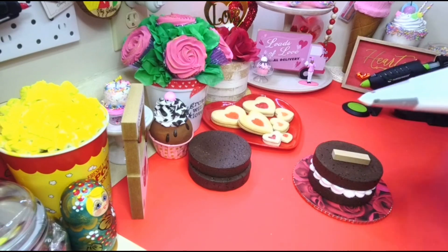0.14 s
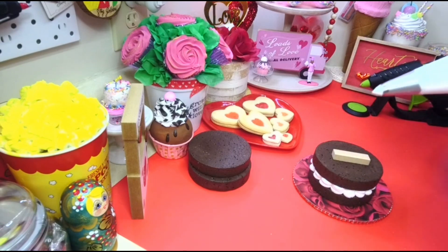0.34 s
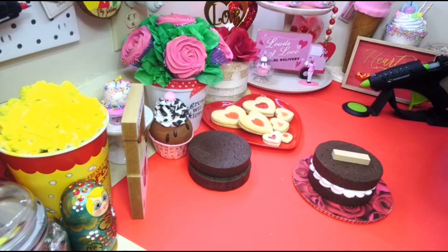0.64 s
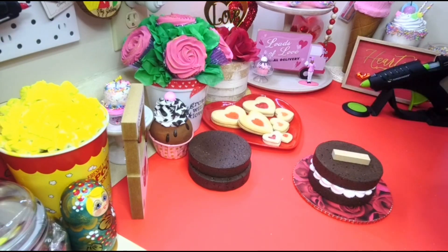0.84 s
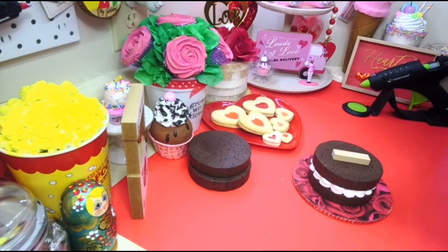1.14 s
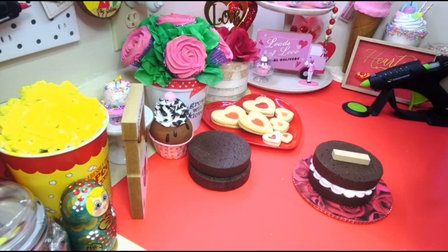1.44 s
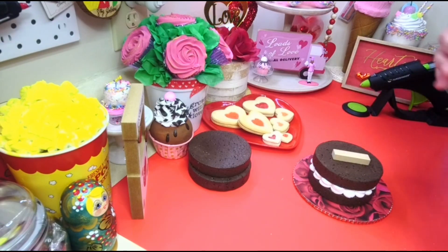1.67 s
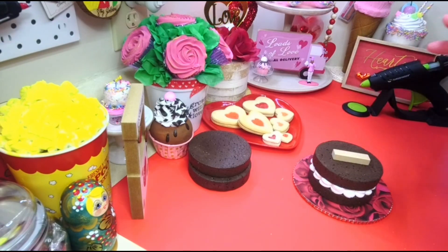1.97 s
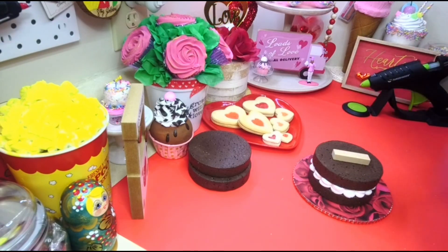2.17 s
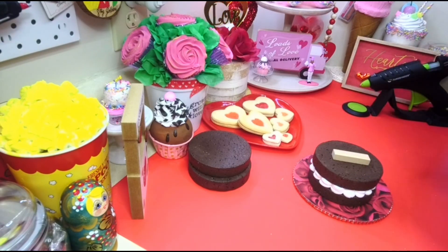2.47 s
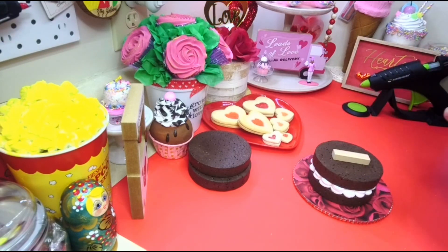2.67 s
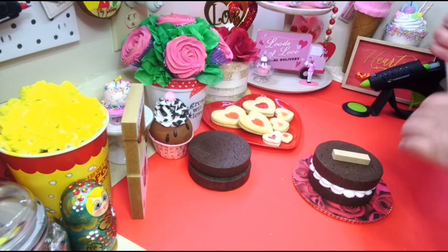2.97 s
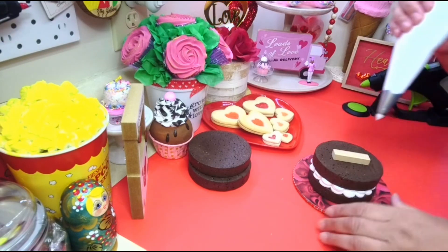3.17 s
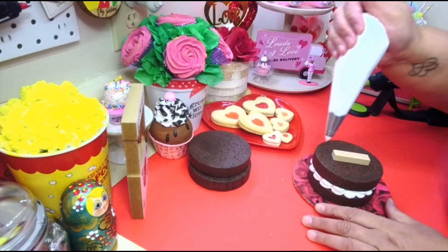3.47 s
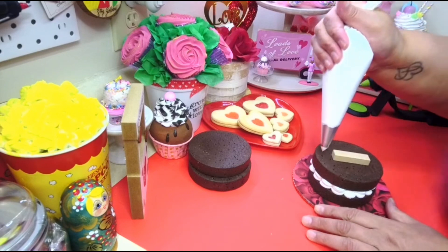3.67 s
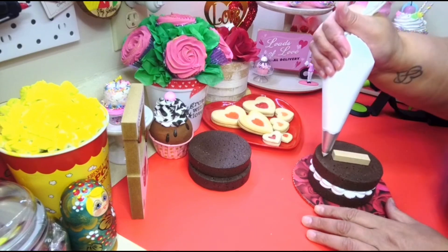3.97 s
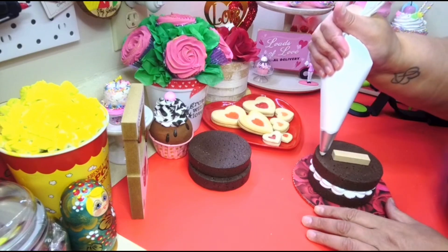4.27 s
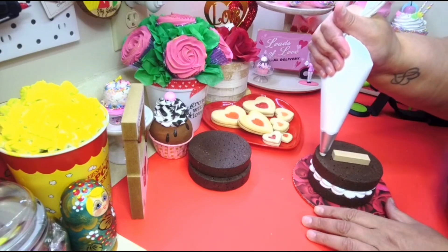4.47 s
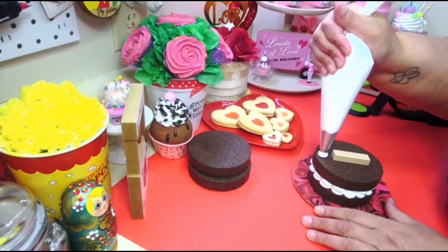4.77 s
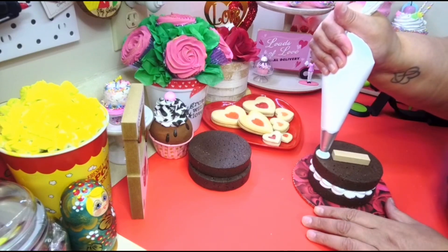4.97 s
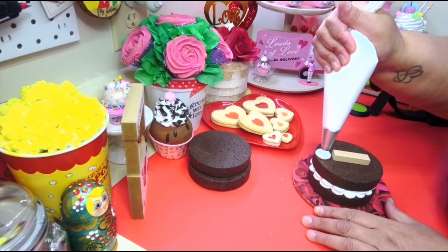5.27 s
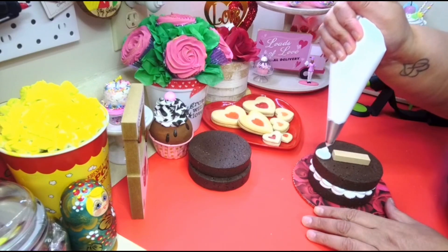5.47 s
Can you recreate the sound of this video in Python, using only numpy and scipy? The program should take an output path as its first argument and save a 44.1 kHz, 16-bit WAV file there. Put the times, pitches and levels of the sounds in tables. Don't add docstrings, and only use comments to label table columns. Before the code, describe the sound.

A small quiet room with a soft low rumble and faint hiss, heard through a close stereo microphone. From about 0.1 s fingers slip lightly on thin plastic, with small crackles near 0.4 and 0.55 s. At 0.7 s the piping bag is grabbed hard: a loud, bright, dense crackle, strongest until about 1 s, then wrung in sharp bursts until 1.7 s. A very faint far drone swells and fades underneath around 0.9 s. From 1.7 to 2.9 s the top is twisted with much softer rustling, silky slides and separate small snaps. Around 3.2 s the filled bag is carried over with a few crisp creases as a palm lands with a dull, low, short thump on the table. A clear snap comes near 3.5 s and a stronger one near 3.76 s; then mostly faint isolated ticks, a brighter pair near 4.7 s, and quiet hush to 5.5 s.

```python
import sys
import numpy as np
from scipy import signal
from scipy.fft import rfft, irfft, next_fast_len
from scipy.io import wavfile
from scipy.ndimage import uniform_filter1d, map_coordinates

SR = 44100
rng = np.random.default_rng(int(sys.argv[2]) if len(sys.argv) > 2 else 0)


def store_wav(level_fs):
    pcm = np.round(np.clip(np.atleast_2d(level_fs), -1, 1) * 32767)
    wavfile.write(sys.argv[1], SR, pcm.T.astype(np.int16))


def boost(x):
    u = np.asarray(x, float) / 20
    return 10 ** u


N = 247842


def unit(x):
    return x / np.sqrt(np.mean(x ** 2) + 1e-20)


def along(points, hz):
    f, v = np.transpose(points)
    return np.interp(np.log(hz + 1), np.log(f + 1), v)


def filtered(x, response):
    m = next_fast_len(x.shape[-1] + 1024)
    spectrum = rfft(x, m) * response(np.fft.rfftfreq(m, 1 / SR))
    return irfft(spectrum, m)[..., :x.shape[-1]]


def panned(x, db):
    return np.array([x * boost(db / 2), x * boost(-db / 2)])


# frequency in Hz, density in dB per Hz.
HUSH_COLOUR = [(12, -45.5), (20, -19.5), (103, -5.5), (155, -17.5), (223, -13), (270, -17.5), (357, -19),
               (571, -20), (713, -26), (1420, -23), (1550, -25.5), (2930, -28.5), (5380, -40),
               (15000, -51.5)]
# frequency in Hz, left-right likeness from 0 to 1.
HUSH_LIKENESS = [(25, .9995), (110, 1), (200, 0.94), (380, .67), (2400, 0.18), (8000, 0.62), (15000, 0.39)]


def hush():
    level_db = -70

    def turn(hz):
        return np.arccos(np.clip(along(HUSH_LIKENESS, hz), -1, 1)) / 2

    def colour(hz):
        return boost(along(HUSH_COLOUR, hz)) * np.array([np.cos(turn(hz)), np.sin(turn(hz))])

    mid, side = filtered(rng.standard_normal((2, N)), colour)
    return boost(level_db) * np.array([mid + side, mid - side]) / np.std(mid)


def strokes(rows, rise, fall):
    t = np.arange(N) / SR
    levels = []
    for start, end, start_db, end_db, *_ in rows:
        end = max(start, end)
        times = [start - 1, start, end, end + 1]
        levels.append(np.interp(t, times, [start_db - rise, start_db, end_db, end_db - fall]))
    return np.array(levels)


# start in seconds, end in seconds, level at start in dB, level at end in dB.
FINGER_SLIDES = [
    (.07, .21, -67, -72.5),
    (.33, .37, -63.5, -56),
    (1.8, 1.9, -56.5, -58.5),
    (2.33, 2.47, -62.5, -60),
    (2.55, 2.66, -64.5, -58),
    (2.9, 3.05, -77, -87),
]
# start in seconds, end in seconds, level at start in dB, level at end in
# dB, body above the crackle in dB.
CRUMPLES = [(0.226, 0.252, -66, -67, -4.5), (0.378, 0.397, -60.5, -52.5, -16),
            (0.541, 0.52, -52.5, -52.5, -19), (0.714, .745, -34, -32, -8), (0.737, 0.905, -39.5, -32, -16),
            (0.91, 1.145, -37, -46, -14), (1.166, 1.192, -38, -45, -18.5),
            (1.239, 1.241, -26.5, -39.5, -31), (1.299, 1.293, -29, -43.5, -25),
            (1.346, 1.374, -41, -56, -26), (1.463, 1.5, -60, -64.5, -16), (1.509, 1.607, -48, -39, -13),
            (1.74, 1.914, -65.5, -66.5, -2.5), (1.94, 2.243, -59, -58, -11.5),
            (2.289, 2.65, -71, -76.5, -3), (2.665, 2.715, -68, -63.5, -11.5),
            (2.783, 2.866, -66, -66.5, -13.5), (3.781, 3.829, -64.5, -76.5, -23.5)]


def handling():
    grip = 2201
    slip = 118.5
    rest_db, rest_body_db, rest_sheen_db = -90, -83, -93.5
    crackle_db = np.maximum(strokes(CRUMPLES, grip, fall=350.5).max(0), rest_db)
    body_db = strokes(CRUMPLES, grip, fall=200.5) + np.array(CRUMPLES)[:, -1:]
    body_db = np.maximum(body_db.max(0), rest_body_db)
    sheen_db = strokes(CRUMPLES, grip, fall=500).max(0) + 3
    sheen_db = np.maximum(sheen_db, strokes(FINGER_SLIDES, slip, slip).max(0))
    sheen_db = np.maximum(sheen_db, rest_sheen_db)
    return crackle_db, body_db - crackle_db, sheen_db - crackle_db


def grains(count, spread_db, low_hz, octaves, cycles):
    draw, t = rng.random((count, 4)), np.arange(128) / SR
    hz = low_hz * 2 ** (octaves * draw[:, 1:2])
    size = boost(np.minimum(-spread_db * np.log(1 - draw[:, 2:3]), 9))
    wave = size * np.sin(2 * np.pi * (hz * t + draw[:, 3:])) * np.exp(-t * hz / cycles)
    at = (draw[:, :1] * N).astype(int) + np.arange(128)
    clumps = map_coordinates(rng.standard_normal(N // 200 + 4), [np.arange(N) / 200])
    return np.bincount(at.ravel(), wave.ravel(), N + 128)[:N] * boost(2.5 * clumps)


def patchy(x, depth_db):
    z = signal.stft(x, nperseg=128)[2]
    field = rng.standard_normal(z.shape[1:])
    field = uniform_filter1d(uniform_filter1d(field, 10, 0), 9, 1)
    return signal.istft(z * boost(depth_db * unit(field)), nperseg=128)[1][:, :N]


# frequency in Hz, density in dB per Hz.
FILM_COLOUR = [(150, -72.5), (250, -13.5), (728, -12), (931, -12.5), (1210, -22.5), (1880, -13),
               (2280, -15.5), (3290, -14), (8630, -9.5), (14300, -7.5), (15700, -12), (16500, -38.5)]
# frequency in Hz, side over mid in dB.
BAG_WIDTH = [(60, -33), (120, -31), (240, -17), (480, -13), (950, -21), (1890, 2), (3770, 5), (7520, -4),
             (15000, -18.5)]


def crackle():
    level_db, body_db, sheen_db = handling()
    swarm = [grains(count=22000, spread_db=4.0, low_hz=970, octaves=4.5, cycles=3.6) for _ in range(2)]
    white = filtered(np.array(swarm), lambda hz: np.clip(hz, 700, 14000) ** 0.66)
    busy = np.clip((level_db + 62) / 25, 0, 1)
    buckles = busy * unit(patchy(white, depth_db=0.5))
    slide = 0.36 * rng.standard_normal((2, N))
    film = (buckles + slide) / np.sqrt(busy ** 2 + 0.048)

    def region(low_hz, high_hz):
        def response(hz):
            width = np.array([np.ones_like(hz), boost(along(BAG_WIDTH, hz) - 10.5)])
            edges = np.sqrt((1 + (low_hz / (hz + 1)) ** 8) * (1 + (hz / high_hz) ** 8))
            return width * boost(along(FILM_COLOUR, hz)) / edges
        return unit(filtered(film, response))

    body = boost(body_db) * region(330, 3000)
    sheen = boost(sheen_db) * region(8000, 30000)
    mid, side = boost(level_db) * (region(3000, 8000) + body + sheen)
    return boost([[-.9], [1.1]]) * np.array([mid + side, mid - side])


# time in seconds, peak level in dB, pitch in Hz.
GRAB_CREASES = [(0.2573, -41, 10500), (0.3541, -35, 10500), (0.3611, -33, 8410), (0.383, -30, 5690),
                (0.399, -29, 8610), (0.5252, -31, 7920), (0.5467, -36, 4240), (0.5534, -37, 7870),
                (0.5704, -42, 5610), (0.7063, -10, 4610), (0.7173, -8, 10500), (0.7254, -9, 4020),
                (0.7304, -10, 9960), (0.7344, -8, 7140), (0.7404, -11, 10600), (0.7474, -14, 8770),
                (0.7726, -12, 10000), (0.7874, -15, 11500), (0.8044, -16, 8360), (0.8121, -9, 8350),
                (0.8234, -14, 8060), (0.8444, -13, 9260), (0.8654, -8, 8650), (0.8734, -12, 8980),
                (0.8964, -5, 9680), (0.9084, -13, 8950), (0.9234, -12, 9620), (0.9534, -13, 14700),
                (0.9714, -16, 8300)]
# time in seconds, peak level in dB, pitch in Hz.
WRING_CREASES = [(1.0146, -13, 10800), (1.034, -15, 9000), (1.0484, -22, 9380), (1.0864, -22, 13200),
                 (1.1004, -22, 8810), (1.1633, -20, 7960), (1.1724, -20, 7980), (1.2032, -21, 9280),
                 (1.2346, -14, 6600), (1.2454, -20, 3520), (1.2564, -23, 4980), (1.288, -20, 10000),
                 (1.2955, -16, 5490), (1.3134, -27, 9760), (1.3344, -21, 14000), (1.3414, -24, 13500),
                 (1.3803, -23, 14700), (1.4287, -40, 10700), (1.4651, -25, 9790), (1.5105, -19, 13300),
                 (1.5184, -20, 8060), (1.5424, -18, 9890), (1.5694, -20, 10800), (1.5868, -19, 14700),
                 (1.6054, -19, 8520), (1.6134, -20, 10000), (1.6414, -25, 7880), (1.6751, -22, 8980)]
# time in seconds, peak level
# in dB, pitch in Hz.
MORE_CREASES = [
    (.6985, -29, 6900),
    (1.2795, -25, 4900),
    (1.4598, -32, 10000),
]
# time in seconds, peak level in dB, pitch in Hz, body above the peak in dB.
TWIST_CREASES = [(1.7224, -37, 4950, -27), (1.727, -33, 8430, -37), (1.7479, -24, 11600, -21),
                 (1.768, -41, 8700, 4.5), (1.7835, -27, 9300, -32), (1.7954, -47, 10200, -20),
                 (1.9221, -23, 9800, -29), (1.936, -36, 9220, -25), (2.0145, -25, 8600, -14),
                 (2.0367, -26, 9000, -20), (2.0487, -24, 7250, -14), (2.0921, -26, 5100, -17),
                 (2.1233, -20.5, 10000, -12), (2.1529, -24, 4000, -13), (2.1987, -34, 4250, -30),
                 (2.2335, -27.5, 8400, -37), (2.2494, -42, 9240, -22), (2.3042, -40, 3600, -15),
                 (2.5337, -29.5, 11800, -38), (2.6786, -30.5, 9700, -16), (2.7038, -31.5, 8980, -16),
                 (2.7699, -25.5, 8200, -37), (2.804, -31.5, 9500, -21), (2.83, -32, 9000, -29),
                 (2.8347, -26, 9330, -14.5), (2.8392, -35, 9900, -8), (2.8894, -47.5, 10000, -27),
                 (2.9983, -53, 4770, -25.5)]
# time in seconds, peak level in dB, pitch in Hz,
# body above the peak in dB, left over right in dB.
CARRY_CREASES = [(3.1276, -54, 3260, -12.5, -5.5), (3.2351, -25, 10770, -14.5, 4.5),
                 (3.2533, -35.5, 7070, -5, 0.0), (3.2657, -25, 13900, -20.5, -5),
                 (3.3685, -31.5, 4200, -9, -4), (3.46, -49, 5970, -14, 0.5), (3.48, -32.5, 6150, -14.5, -3),
                 (3.5082, -19, 10400, -22, -4), (3.593, -54, 7770, -13, 1.5),
                 (3.6107, -46.5, 5940, -16, -5), (3.6979, -39, 6090, -6, -5), (3.7203, -47, 6100, -3, -1.5)]
# time in seconds,
# peak level in dB, pitch in Hz, body above the peak in dB, left over right in dB.
SQUEEZE_CREASES = [(3.7603, -17, 6560, -24.5, -6.5), (3.8267, -38, 8300, -26, -11),
                   (3.8788, -43, 13350, -20, -7), (3.9298, -60, 8170, -9.5, 10),
                   (3.9833, -50.5, 4720, -13, -6), (4.0478, -46, 6600, -6, -1.5),
                   (4.0969, -44.5, 8100, -6, -3), (4.2103, -56, 8140, -11.5, -3),
                   (4.2883, -38.5, 8270, -10.5, -4), (4.326, -53, 10250, -14, -9),
                   (4.4285, -51.5, 7940, -12.5, 0), (4.6661, -28, 6310, -13, -6),
                   (4.6956, -26.5, 6660, -21, -9.5), (5.0514, -42, 8870, -17, 3.5),
                   (5.2217, -53.5, 7970, -11.5, 1)]


def crease_rows():
    luck = rng.standard_normal((100, 2))
    per_s = 70
    s = CRUMPLES[0][0] + (np.arange(len(luck)) + rng.random(len(luck))) / per_s
    db = np.interp(s, np.arange(N) / SR, handling()[0]) + 5.5 + 1.5 * luck[:, 0]
    hz = np.clip(9500 * 2 ** (.45 * luck[:, 1]), 3500, 14800)
    s, db, hz = np.r_[GRAB_CREASES, WRING_CREASES, MORE_CREASES, np.c_[s, db, hz]].T
    body_db = -20.5 - 1.5 * np.log2(hz / 9000) - 0.1651 * (db + 28)
    body_db = body_db + 2 * rng.standard_normal(len(s))
    loose = np.r_[TWIST_CREASES, np.c_[s, db, hz, body_db]]
    pan_db = -2.5 + 1.8 * rng.standard_normal(len(loose))
    return np.r_[CARRY_CREASES, SQUEEZE_CREASES, np.c_[loose, pan_db]]


def creases():
    snap_s, bounce_s, bounce_db, rattle_db = .0007, .00045, -1.5, -8.5
    out, t = np.zeros((2, N + 1024)), np.arange(-64, 700) / SR

    def flip(t60):
        return (t > 0) * boost(-60 * t / t60) * np.clip(t / 0.0016, 0, 1)

    def spike(at):
        return np.sinc((t - at) * SR)

    def dull_colour(f):
        return boost(along(FILM_COLOUR, f)) / (1 + (f / 2800) ** 6) / (1 + (900 / (f + 1)) ** 4)

    for s, db, hz, body_db, pan_db in crease_rows():
        def bright_colour(f):
            ring = 0.48 + 1 / (1 + ((f - hz) / (0.086 * hz)) ** 2)
            edges = (1 + (2800 / (f + 1)) ** 4) * (1 + (f / 13000) ** 3)
            return ring * boost(0.86 * along(FILM_COLOUR, f)) / edges

        shake = rng.standard_normal((3, len(t)))
        rattle = boost(rattle_db) * shake[0] * (flip(0.0046) + 0.2 * flip(0.034))
        bounce = boost(bounce_db) * spike(snap_s + bounce_s * (1 + .25 * shake[0, 0]))
        bright = filtered(rattle + spike(snap_s) - bounce, bright_colour)
        dull, side = filtered(shake[1:] * flip(0.031), dull_colour)
        flex = dull + .5 * np.outer([1, -1], side)
        flex = boost(body_db - 13.5) * flex / np.abs(dull).max()
        snap = panned(bright / np.abs(bright).max(), pan_db) + flex
        out[:, round(s * SR) - 64:][:, :len(t)] += boost(db + 0.5) * snap
    return out[:, :N]


# frequency in Hz, level in dB.
WALL_COLOUR = [(500, 0), (2500, -3.5), (6000, -4.5), (15000, -4)]
# frequency in Hz, time to fall 60 dB in seconds.
ROOM_DECAY = [(500, 0.68), (2600, 0.19), (7000, 0.26), (15000, 0.3)]


def room(bag, alike, near_db):
    x = filtered(bag.mean(0), lambda hz: boost(along(WALL_COLOUR, hz)))
    out, step = np.zeros((2, N + SR)), SR // 8
    for start in range(0, N, step):
        hz, t, z = signal.stft(rng.standard_normal((2, SR // 3)), SR, nperseg=256)
        fading = z * boost(-60 * t / along(ROOM_DECAY, hz)[:, None])
        late = signal.istft(fading, SR, nperseg=256)[1]
        near = rng.standard_normal(late.shape) * boost(-60 * np.arange(late.shape[1]) / SR / 0.03)
        a, b = late / np.linalg.norm(late[0]) + boost(near_db) * near / np.linalg.norm(near[0])
        b = (1 - alike) * filtered(b, lambda f: 1 / (1 + (1100 / (f + 1)) ** 2))
        wet = signal.fftconvolve(x[None, start:start + step], np.array([a + b, a - b]), axes=1)
        out[:, start + 60:][:, :wet.shape[1]] += wet
    return out[:, :N]


# time in seconds, pitch in Hz, level in dB.
FAR_DRONE = [
    (0.55, 124.4, -75.5),
    (0.89, 128, -62.5),
    (1.2, 122.9, -75),
]


def drone():
    t = np.arange(N) / SR
    s, pitch, level = np.transpose(FAR_DRONE)
    hz, db = np.interp(t, s, pitch), np.interp(t, s, level)
    edge = np.interp(t, [.5, .6, 1.15, 1.25], [0, 1, 1, 0])
    return np.sqrt(2) * edge * boost(db) * np.sin(2 * np.pi * np.cumsum(hz) / SR)


# start in seconds, level in dB, pitch in Hz, time to fall 60 dB in seconds.
PALM_MODES = [
    (3.227, -52, 62, 0.55),
    (3.23, -50.5, 131, 0.26),
    (3.251, -60, 46.4, 0.41),
    (3.331, -54, 100, 0.32),
]


def hand():
    out = np.zeros(N)
    for s, db, hz, t60 in PALM_MODES:
        t = np.clip(np.arange(N) / SR - s, 0, None)
        swell = 1 - np.exp(-t / 0.0073)
        out += boost(db - 60 * t / t60) * swell * np.sin(2 * np.pi * hz * t)
    return out


def scene():
    bag = crackle() + creases()
    walls = boost([[-9.5], [-7.5]]) * room(bag, alike=0.78, near_db=6.5)
    return hush() + bag + walls + drone() + hand()


def top_cut(x):
    return signal.sosfilt(signal.butter(12, 16840, fs=SR, output="sos"), x)


def record(dry):
    mix = filtered(dry, lambda hz: np.interp(hz, [0, 15600, 15900, 16700, 16850], [1, 1, .15, .08, 0]))
    return top_cut(mix)


dry = scene()
out = record(dry)
store_wav(out)
```